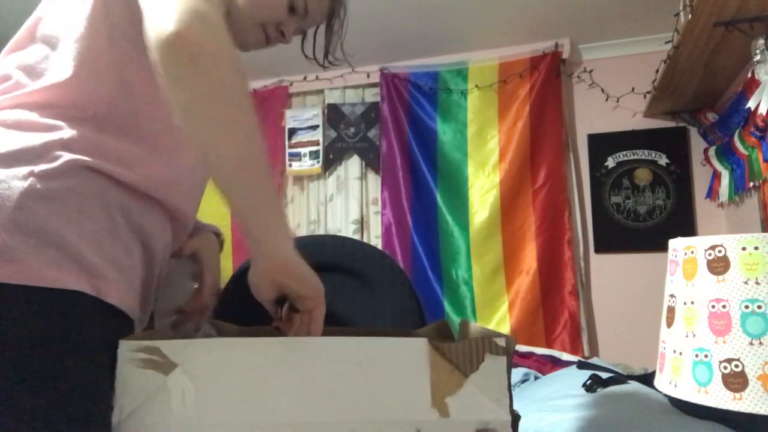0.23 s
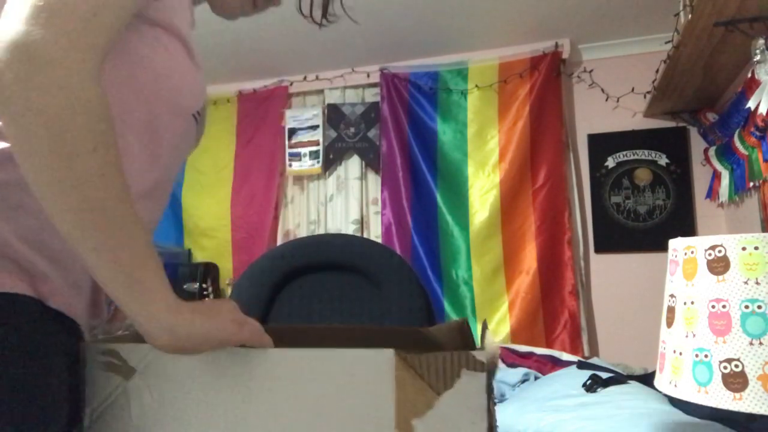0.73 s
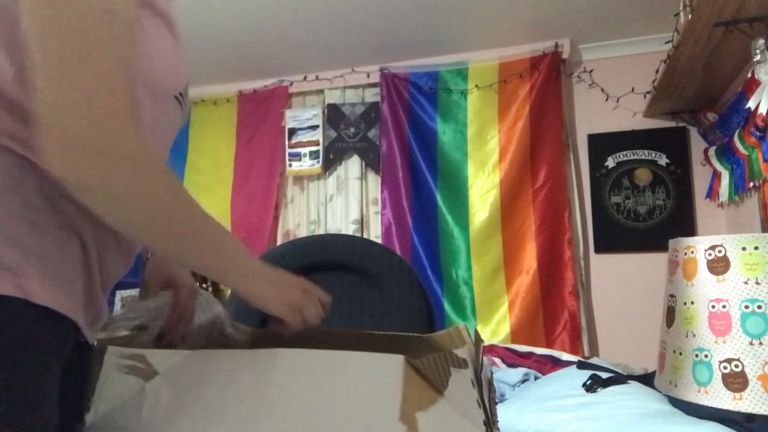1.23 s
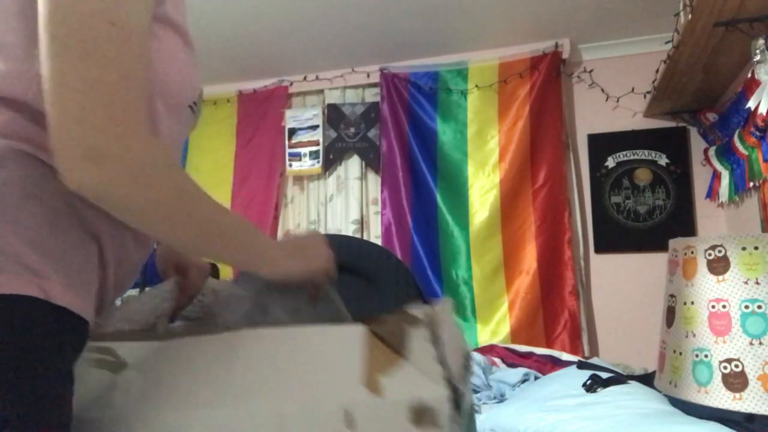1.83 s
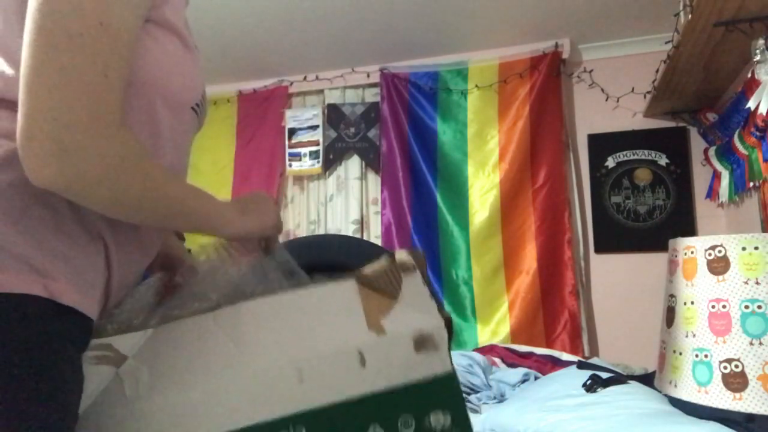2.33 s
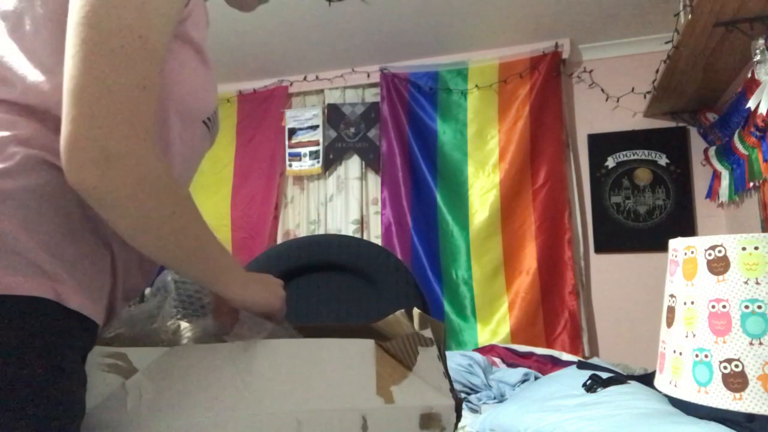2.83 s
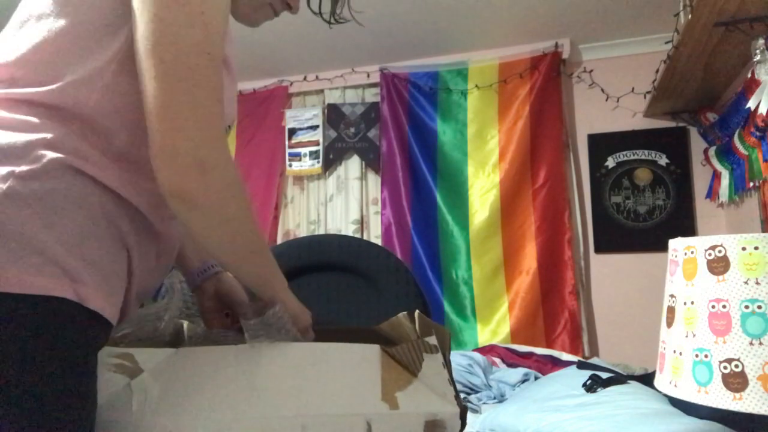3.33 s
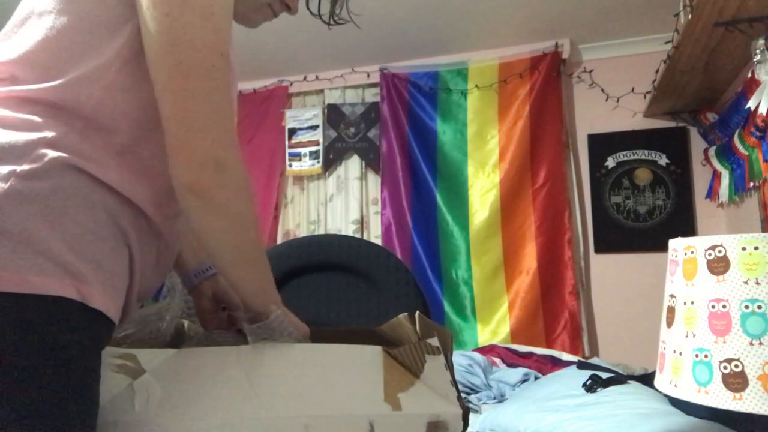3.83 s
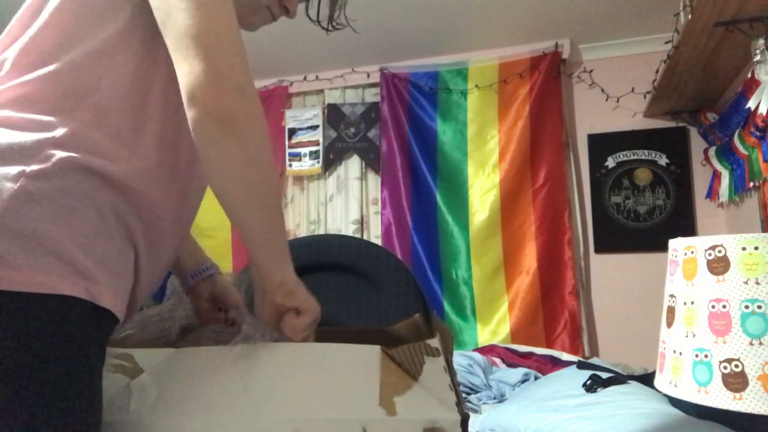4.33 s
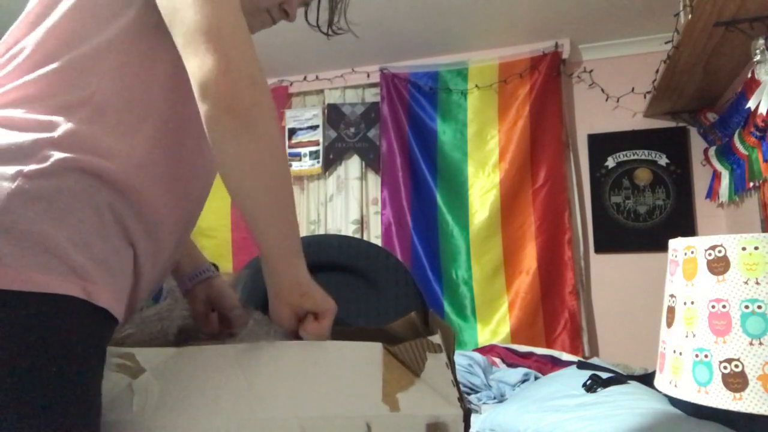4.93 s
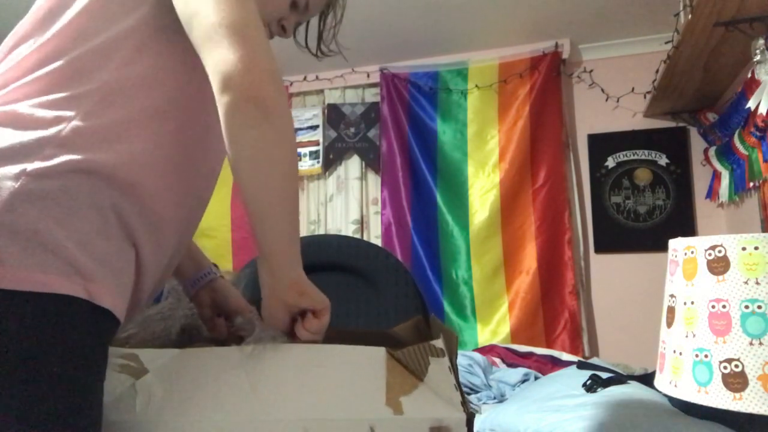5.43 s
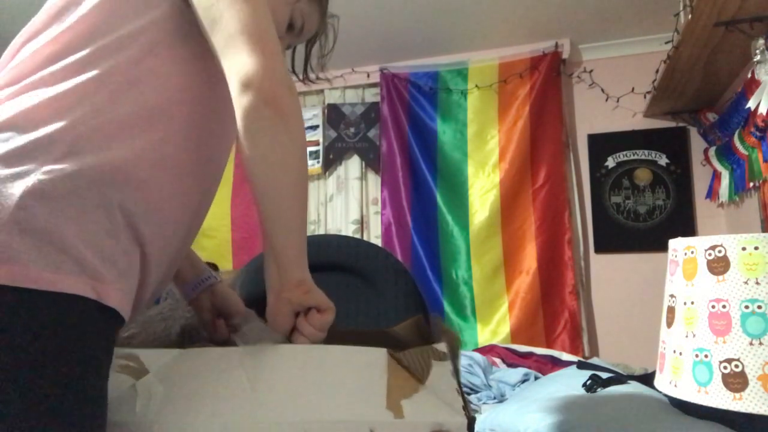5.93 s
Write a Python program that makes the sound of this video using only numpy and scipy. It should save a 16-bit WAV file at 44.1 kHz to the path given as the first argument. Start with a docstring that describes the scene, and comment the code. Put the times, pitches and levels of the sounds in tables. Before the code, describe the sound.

In a small bedroom, crisp packing paper is worked inside a cardboard box. Uneven crinkling opens with a light tap, quick scrapes come at about one second, then a fuller rustle and a loud crease snap. Box knocks follow in the middle, a sharp pair past four seconds, then quieter crackle before a heavy tumble of cardboard knocks at the end. A close small microphone, little deep bass, faint low hum.

```python
"""Crinkling, sliding and snapping paper, knocks and bumps of a cardboard box, a low hum in a small bedroom.
Packing paper is pulled about: its buckles are clumped damped cycles over a noise swish.
Sliding strokes are flurries of slips; creases snap as a tick plus facet modes.
Knocks sum noise, a flap tone and panel modes; bumps are resonant noise puffs.
Short room responses surround the sources; air is shaped noise, hum wavering sines."""
import sys
import numpy as np
from scipy import signal
from scipy.fft import rfft, irfft, next_fast_len
from scipy.io import wavfile
from scipy.ndimage import map_coordinates

SR = 44100
rng = np.random.default_rng(int(sys.argv[2]) if len(sys.argv) > 2 else 0)


def transcribe(u):
    """Save the signal u as a 16-bit wav file named by the first command-line argument.

    u: samples, shape (n,) or (channels, n), limited to [-1, 1]; the rate is SR.
    q: integer samples, one column per channel.
    """
    v = np.clip(np.atleast_2d(u).T, -1, 1)
    q = np.round(v * 32767).astype(np.int16)
    wavfile.write(sys.argv[1], SR, q)


N = 272317
TIME = np.arange(N) / SR  # s
AGE = np.arange(SR // 3) / SR  # s since a blow

# Levels in the tables precede the trims named in the functions.
# Pulls on the wrapping. Each row: crest in s, rise in s, fall in s, crinkle level at the crest in dB,
# rub on the box relative to it in dB.
PULL_ROWS = [(0.03, .1, 0.35, -48, -11), (0.14, .06, 0.14, -50.5, 4), (0.4, 0.12, .15, -55.5, -8),
             (0.58, 0.36, 0.25, -50.5, -0.5), (0.79, 0.095, 0.051, -56.5, 2), (1.04, 0.089, 0.12, -50, -6),
             (1.19, 0.21, 0.27, -50, -1.5), (1.39, 0.067, 0.082, -49, -0.5), (1.559, 0.17, 0.66, -41.5, -2),
             (1.74, 0.063, 0.12, -46, -5.5), (1.88, 0.14, 0.32, -48, -3.5), (2.11, 0.056, 0.056, -62, 9),
             (2.31, 0.034, 0.059, -64, 5.5), (2.5, 0.067, 0.14, -49, -5), (2.61, 0.2, 0.092, -43, 0),
             (2.77, 0.085, .15, -52.5, -2), (2.93, 0.13, 0.2, -45.5, 0), (3.2, 0.13, 0.28, -55, -5),
             (3.46, 0.057, 0.035, -52.5, -1.5), (3.528, 0.027, 0.065, -56, 2.5),
             (3.631, 0.031, .08, -53.5, -6), (3.77, 0.017, 0.026, -56, -10), (3.85, 0.098, .18, -61, 0),
             (4.03, .1, 0.4, -49.5, -1.5), (4.19, 0.24, 0.14, -54, -13), (4.31, 0.11, 0.21, -49.5, 2.5),
             (4.46, 0.096, 0.13, -52, -3.5), (4.539, 0.073, 0.1, -54.5, -8), (4.8, 0.055, 0.37, -51, 0.5),
             (5.06, 0.15, 0.091, -58.5, 3.5), (5.21, 0.083, 0.34, -54, -3.5), (5.45, 0.11, 0.063, -54.5, 0),
             (5.52, 0.033, 0.015, -53.5, 2.5), (5.579, .02, 0.018, -56, -14), (5.64, .03, .2, -60.5, -2),
             (5.743, .04, 0.12, -48.5, -4.5), (5.89, 0.029, 0.37, -57.5, -3), (6.06, 0.23, 0.088, -47, 3.5),
             (6.17, 0.071, 0.056, -50.5, -3)]
# Hiss of the sheets relative to their crinkle. Each row: time in s, level in dB.
SIZZLE_LEVEL = [(0, -19), (0.8, -15), (1.4, -22), (1.95, -17), (2.3, -38), (2.55, -19), (3.0, -17),
                (3.7, -20), (4.4, -23), (4.95, -11.5), (5.3, -14), (6.17, -22)]
# Strokes of a sheet over the card. Each row: start in s, crest in s, end in s, level at the crest in dB,
# sheet resonance in Hz, resonance level relative to the scrape in dB.
STROKE_ROWS = [(0.512, 0.546, 0.62, -42.5, 1070, -1), (0.887, 0.9, 1.03, -37, 4170, -5.5),
               (0.901, 0.97, 1.012, -29, 1140, -9.5), (0.983, 1.006, 1.066, -27, 4600, -11.5),
               (1.363, 1.399, 1.404, -39, 5100, -2), (1.485, 1.595, 1.6, -33.5, 2880, -30),
               (2.953, 2.993, 3.03, -37, 2800, -15), (3.015, 3.026, 3.055, -31.5, 1330, -5.5),
               (4.253, 4.258, 4.426, -35, 1190, -7), (4.311, 4.364, 4.365, -34, 850, -7),
               (4.785, 4.8, 4.95, -44.5, 870, -3), (4.871, 4.901, 4.966, -39.5, 1978, -8.5),
               (5.184, 5.2, 5.222, -46, 900, -2), (5.946, 6.005, 6.03, -33.5, 3230, -31)]
# Creases that snap through. Each row: time in s, level in dB, pitch in Hz, tick relative to the level in dB.
SNAP_ROWS = [(0.0598, -35, 2650, -20), (1.13, -43, 1200, -9), (1.181, -41, 1630, -18),
             (1.1875, -36, 1340, -12), (1.209, -38.5, 1280, -7.5), (1.2468, -29.5, 2770, -11.5),
             (1.3685, -32, 2770, -16), (1.395, -35.5, 3900, -25), (1.4706, -38, 3600, -18),
             (1.621, -27.5, 1430, -12), (1.7462, -23.5, 3320, -20), (1.8163, -9.5, 1795, -22),
             (1.861, -33, 1590, -8), (2.314, -44, 3350, -30.5), (2.4778, -38, 2300, -23),
             (2.5602, -32, 1610, -6), (2.7374, -39, 1520, -15), (2.8997, -31.5, 2800, -16),
             (2.9322, -36, 1210, -19), (2.971, -25, 2500, -24), (3.034, -20.5, 2240, -25),
             (3.098, -43, 1230, -3), (3.321, -39.5, 2540, -25), (3.456, -34, 2300, -32),
             (3.5217, -35.5, 1070, -18), (4.0184, -29.5, 2350, -17), (4.438, -35, 3450, -27.5),
             (4.4574, -35, 1200, -12), (5.2978, -39.5, 3105, -12), (5.736, -37, 3560, -24),
             (5.8797, -39, 2200, -24)]
# Modes of a paper facet. Each row: multiple of the lowest mode, level in dB.
FACET_MODES = [(1, 0.5), (1.2, -10), (1.45, -12.5), (1.77, -3), (2.12, -9.5), (2.4, -7), (2.75, -15)]
# Knocks on flaps and walls. Each row: time in s, level in dB, panels relative to it in dB,
# crack relative to it in dB, flap pitch in Hz.
KNOCK_ROWS = [(0.011, -25, -21, -8, 1180), (0.017, -30, -29, -6, 1920), (0.322, -30.5, -9, -5, 1670),
              (2.103, -29.5, -15, -27, 1140), (2.423, -31, -17, -18, 1110), (2.559, -23.5, -12, -9.5, 1490),
              (2.591, -21.5, -7, -14, 780), (2.613, -38, -19, -7, 840), (2.959, -25, -19, -28, 1240),
              (2.971, -26, -6, -6.5, 1370), (3.117, -33.5, -28, -13, 1200),
              (3.632, -15.5, -12.5, -16, 1000), (3.638, -25.5, -13, -19, 2300),
              (4.257, -18.5, -13.5, -10, 1390), (4.305, -13.5, -11.5, -10, 1100),
              (4.309, -16, -10.5, -10.5, 2560), (4.404, -28, -5, -34, 700), (4.791, -24.5, -12.5, -28, 830),
              (4.835, -19, -8, -18.5, 1475), (5.181, -44, -6.5, -5.5, 1370), (5.447, -34, -11, -13, 1590),
              (5.624, -41.5, -21, -8.5, 1450), (5.691, -39, -9, -25, 608), (5.935, -7.5, -12, -12, 575),
              (5.940, -14.5, -23, -11, 2720), (5.966, -18.5, -5, -10, 570), (5.976, -18.5, -16, -7.5, 3260),
              (5.983, -20.5, -12, -18.5, 570), (6.026, -14, -15.5, -16, 1260),
              (6.035, -18.5, -9.5, -9, 1270), (6.154, -27, -15, -31, 860)]
# Modes of the cardboard panels. Each row: mean frequency in Hz, mean level in dB, t60 in s.
PANEL_MODES = [(163, -10.5, 0.13), (246, -7.5, 0.19), (325.4, -9, 0.14), (412, -6, 0.025), (481, -3, 0.11),
               (541.5, 1.5, 0.095), (623, -2, 0.085), (777, 1, 0.062), (1012, -3, 0.065), (1220, -7, 0.035),
               (1770, -3.5, 0.048), (2450, -17, 0.036), (2800, -31, 0.034)]
# Soft bumps of the whole box. Each row: time in s, level in dB, pitch in Hz.
BUMP_ROWS = [(0.009, -28, 308), (0.014, -31, 86.6), (0.115, -28, 166), (0.137, -33, 149),
             (0.325, -35.5, 247), (0.617, -34.5, 210), (0.635, -35.5, 540), (1.479, -39, 75),
             (1.82, -26, 476), (1.935, -34.5, 417), (2.594, -46, 760), (2.954, -36, 265),
             (2.974, -31.5, 323), (3.635, -32, 261), (4.307, -23.5, 424), (4.325, -27, 268),
             (4.898, -31, 210), (4.98, -32, 149.9), (4.982, -40, 516), (5.939, -24.5, 75),
             (5.969, -18, 170), (5.975, -22.5, 540), (6.039, -26, 67.7)]
# Spectra of buckles, hiss, wall rub, slide, flap, crack and room air.
# Each row: frequency in Hz, relative level in dB per Hz.
CRINKLE_SPECTRUM = [(100, -16), (400, -14.5), (1100, 1), (2200, -3.5), (4200, -3), (7000, -6),
                    (10300, -14.5), (12500, -14), (16000, -19.5)]
SIZZLE_SPECTRUM = [(3000, -34), (6000, -5), (9000, 9), (10300, -8), (12500, -4), (16000, -8)]
RUB_SPECTRUM = [(40, -14), (80, -1), (170, -4), (280, -1), (600, 0), (1000, -6), (2000, -18.5), (6000, -45)]
SLIDE_SPECTRUM = [(60, -24), (200, -11), (350, -6), (800, -5), (1200, -4.5), (1600, -9.5), (3800, -7),
                  (6300, -8.5), (8500, -11.5), (10300, -19), (12500, -15.5), (16000, -21)]
FLAP_SPECTRUM = [(80, -37), (300, -12.5), (600, -4.5), (1250, 0.5), (2600, -7.5), (4200, -9.5), (7000, -43),
                 (16000, -36)]
CRACK_SPECTRUM = [(500, -4.5), (2500, 1.5), (4200, -2.5), (6500, -6.5), (9000, -11.5), (10300, -21),
                  (12500, -18.5), (16000, -30.5)]
AIR_SPECTRUM = [(20, -63), (45, 23), (72, 18.5), (85, 10), (100, -12), (125, 9), (150, -10), (200, -4),
                (450, -13), (2700, -7), (6500, -34), (16000, -58)]
# Room decay. Each row: frequency in Hz, t60 in s.
ROOM_DECAY = [(80, 0.34), (260, 0.46), (700, 0.17), (2000, 0.15), (5000, 0.12), (14000, 0.19)]
# Early wall echoes. Each row: mean delay in s, linear gain.
WALL_ECHOES = [(.0031, 0.16), (.0064, 0.14), (0.0142, 0.11), (.018, 0.099)]
# Hum partials. Each row: frequency in Hz, rms level in dB.
HUM_PARTIALS = [(96.9, -69), (147, -70.5)]


def amp(db):
    """Decibels to gain."""
    return 10 ** (np.asarray(db) / 20)


def unit(x):
    """Scale to rms 1."""
    return x / np.sqrt(np.mean(x ** 2) + 1e-20)


def blow(x):
    """Scale a transient to the energy of one millisecond at rms 1."""
    return x / np.sqrt(np.sum(x ** 2) * 1000 / SR + 1e-20)


def fade(t_s, t60_s):
    """Exponential decay, 60 dB down after t60."""
    return np.exp(-np.log(1000) * t_s / t60_s)


def along(points, hz):
    """Interpolate (Hz, value) points on a log frequency axis."""
    point_hz, value = np.transpose(points)
    return np.interp(np.log(hz + 1), np.log(point_hz), value)


def wobble(rate_hz):
    """Smooth random curve with rate_hz knots a second."""
    knots = rng.standard_normal(int(N * rate_hz / SR) + 4)
    return map_coordinates(knots, [TIME * rate_hz])


def colour(x, spectrum):
    """Causal minimum-phase filter, made by folding the cepstrum of the given spectrum."""
    m = 2 * next_fast_len(len(x) // 2 + 4096)
    gain = amp(along(spectrum, np.fft.rfftfreq(m, 1 / SR)))
    cepstrum = irfft(np.log(gain))
    cepstrum[1:m // 2] *= 2
    cepstrum[m // 2 + 1:] = 0
    response = np.exp(rfft(cepstrum))
    return irfft(rfft(x, m) * response)[:len(x)]


def resonate(x, hz, q):
    """One resonance."""
    b, a = signal.iirpeak(min(hz, SR / 4), max(q, .5), SR)
    return signal.lfilter(b, a, x)


def burst(t60_s):
    """Dying puff of noise."""
    return rng.standard_normal(len(AGE)) * fade(AGE, t60_s)


def add(track, start_s, x):
    """Mix x into the track at start_s."""
    i = max(round(start_s * SR), 0)
    track[i:i + len(x)] += x[:max(N - i, 0)]


def grains(rate_hz, spread_db, cap_db, centre_hz, cycles, samples=220):
    """Tiny buckles of a sheet: damped cycles of random pitch and strength, rms 1."""
    count = int(rate_hz * N / SR)
    start = rng.integers(0, N, count)
    hz = np.clip(centre_hz * np.exp(0.67 * rng.standard_normal((count, 1))), 400, SR / 3)
    strength_db = np.minimum(spread_db * rng.exponential(size=(count, 1)), cap_db)
    strength = amp(strength_db) * rng.choice([-1, 1], (count, 1))
    t = AGE[:samples]
    waves = strength * hz ** 0.62 * np.sin(2 * np.pi * hz * t) * fade(t, cycles / hz)
    index = start[:, None] + np.arange(len(t))
    return unit(np.bincount(index.ravel(), waves.ravel())[:N])


def wrapping(swish_db=-5.5, rub_db=-1.0, clump_db=2, crowded_db=-42):
    """Worked sheets buckle in clumps over a fine swish and hiss, and rub the box walls."""
    work, rub = effort()
    clumps = amp(clump_db * wobble(rate_hz=55))
    ticks = grains(rate_hz=700, spread_db=4.5, cap_db=20, centre_hz=6000, cycles=4)
    facets = grains(rate_hz=450, spread_db=5.5, cap_db=18, centre_hz=3000, cycles=11)
    crowd = grains(rate_hz=4000, spread_db=3.5, cap_db=14, centre_hz=3600, cycles=5)
    share = work / (work + amp(crowded_db))  # harder work crowds the buckles together
    mixed = np.sqrt(1 - share) * unit(ticks + facets) + np.sqrt(share) * crowd
    buckles = unit(colour(clumps * mixed, CRINKLE_SPECTRUM))
    swish = unit(colour(rng.standard_normal(N), CRINKLE_SPECTRUM))
    walls = unit(colour(clumps * rng.standard_normal(N), RUB_SPECTRUM))
    hiss = unit(colour(clumps * rng.standard_normal(N), SIZZLE_SPECTRUM))
    hiss_db = np.interp(TIME, *np.transpose(SIZZLE_LEVEL))
    sheets = buckles + amp(swish_db) * swish + amp(hiss_db) * hiss
    return work * sheets + rub * amp(rub_db) * walls


def effort(rest_db=-72, drop_db=15):
    """Each pull tightens the wrapping to its crest, then lets it relax: (crinkle gain, rub gain)."""
    # resting wrapping keeps settling; a pull swells and dies by drop_db over its rise and fall
    crinkle_power, rub_power = np.full((2, N), amp(rest_db) ** 2)
    for crest_s, rise_s, fall_s, db, rub_db in PULL_ROWS:
        away = np.maximum((crest_s - TIME) / rise_s, (TIME - crest_s) / fall_s)
        gain = amp(db - drop_db * np.minimum(away, 10))
        crinkle_power = crinkle_power + gain ** 2
        rub_power = rub_power + (gain * amp(rub_db)) ** 2
    return np.sqrt(crinkle_power), np.sqrt(rub_power)


def slides(catch=0.87, catch_t60_s=0.012, sheet_q=8, squeak_db=-6):
    """A sliding sheet catches at its folds and lets go in flurries of tiny slips; its taut part resonates."""
    releases = (rng.random(N) < 150 / SR) * 1.0  # 150 a second on average
    flurries = 1 + catch * signal.fftconvolve(releases, fade(AGE, catch_t60_s))[:N]
    slips = flurries * grains(rate_hz=4500, spread_db=3.5, cap_db=11.5, centre_hz=3650, cycles=5.0)
    # taut facets sing briefly
    squeaks = grains(rate_hz=260, spread_db=3, cap_db=9.5, centre_hz=2499, cycles=76, samples=1500)
    scrape = colour(slips + amp(squeak_db) * squeaks, SLIDE_SPECTRUM)
    out = np.zeros(N)
    for start_s, crest_s, end_s, db, hz, ring_db in STROKE_ROWS:
        t = np.arange(start_s, max(end_s, start_s + .01), 1 / SR)
        offset = int(rng.random() * (N - SR))  # each stroke crosses another patch of card
        patch = unit(scrape[offset:][:len(t)])
        force = np.interp(t, [start_s, crest_s, end_s], [0, 1, 0])
        ring = amp(ring_db) * unit(resonate(patch, hz, sheet_q))
        add(out, start_s, amp(db) * force * unit(patch + ring))
    return out


def snaps(ring_db=-4, tick_trim_db=4, ring_t60_s=0.0063, tick_t60_s=0.0023):
    """A crease flips: a sharp tick and a brief ring of the facet beside it."""
    out = np.zeros(N)
    ratio, mode_db = np.transpose(FACET_MODES)[:, :, None]
    for start_s, db, hz, tick_db in SNAP_ROWS:
        phase = 2 * np.pi * rng.random(ratio.shape)
        modes = np.sum(amp(mode_db) * np.sin(2 * np.pi * hz * ratio * AGE + phase), axis=0)
        ring = blow(modes * np.sqrt(AGE) * fade(AGE, ring_t60_s))
        tick = blow(resonate(burst(tick_t60_s), 5400, q=1.0))
        snap = amp(ring_db) * ring + amp(tick_db + tick_trim_db) * tick
        add(out, start_s + 0.000984, amp(db) * snap)
    return out


def knocks(clap_db=-10, flap_db=-9, crush_db=-9, panel_trim_db=5, crack_trim_db=4,
           crush_t60_s=0.042, flap_t60_s=0.013, crack_t60_s=0.033):
    """A struck flap claps and swings briefly, the card crushes and cracks, and the panels ring."""
    out = np.zeros(N)
    hz, mode_db, t60_s = np.transpose(PANEL_MODES)[:, :, None]
    clap = blow(colour(signal.unit_impulse(len(AGE)), FLAP_SPECTRUM))
    for start_s, db, panel_db, crack_db, flap_hz in KNOCK_ROWS:
        strength_db = mode_db + 3.8 * rng.standard_normal(hz.shape)
        strength = amp(strength_db) * rng.choice([-1, 1], hz.shape)
        flex = 1 + 0.016 * rng.standard_normal(hz.shape)  # the grip retunes the panels
        modes = strength * np.sin(2 * np.pi * hz * flex * AGE) * fade(AGE, t60_s)
        ring = blow(np.sum(modes, axis=0))
        swing = blow(np.sin(2 * np.pi * flap_hz * AGE) * fade(AGE, flap_t60_s) * np.sqrt(AGE))
        crush = blow(colour(burst(crush_t60_s), FLAP_SPECTRUM))
        crack = blow(colour(burst(crack_t60_s), CRACK_SPECTRUM))
        contact = amp(clap_db) * clap + amp(crush_db) * crush + amp(crack_db + crack_trim_db) * crack
        body = amp(flap_db) * swing + amp(panel_db + panel_trim_db) * ring
        add(out, start_s + .001, amp(db) * (contact + body))
    return out


def bumps(trim_db=3, t60_s=0.061, rise_s=0.0019, box_q=1.1):
    """Soft blows shake the box and the air inside it: noise puffs through two equal resonances."""
    out = np.zeros(N)
    for start_s, db, hz in BUMP_ROWS:
        push = burst(t60_s) * (1 - np.exp(-AGE / rise_s))
        thud = blow(resonate(resonate(push, hz, box_q), hz, box_q))
        add(out, start_s, amp(db + trim_db) * thud)
    return out


def room(x, wet_db=-6, walls_db=-1, stray=.12):
    """Near walls echo over a short diffuse tail; each moment sounds from another spot of the box."""
    out = np.zeros(N)
    hop = SR // 32
    starts = range(-hop, N, hop)
    noise = rng.standard_normal((len(starts), SR // 4))
    hz, t, z = signal.stft(noise, SR, nperseg=256)
    decay = fade(t, along(ROOM_DECAY, hz)[:, None])
    tails = signal.istft(z * decay, SR, nperseg=256)[1]
    for start, tail in zip(starts, tails):
        response = amp(wet_db) * tail / np.linalg.norm(tail)
        response[0] = 1  # direct sound
        for delay_s, gain in WALL_ECHOES:
            strayed_s = delay_s * np.exp(stray * rng.standard_normal())
            response[round(strayed_s * SR)] += gain * amp(walls_db)
        i = np.arange(max(start, 0), min(start + 2 * hop, N))
        piece = x[i] * np.sin(np.pi * (i - start) / (2 * hop)) ** 2  # overlapping windows sum to 1
        add(out, i[0] / SR, signal.fftconvolve(piece, response / np.linalg.norm(response)))
    return out


def background(air_db=-66, hum_trim_db=-4):
    """Still room air as shaped noise, and a low hum wavering in level and phase."""
    hum = np.zeros(N)
    for hz, db in HUM_PARTIALS:
        gain = amp(db + hum_trim_db + 1.8 * wobble(rate_hz=4.03)) * np.sqrt(2)
        hum += gain * np.sin(2 * np.pi * hz * TIME + wobble(rate_hz=8.6))
    air = unit(colour(rng.standard_normal(N), AIR_SPECTRUM))
    return hum + amp(air_db) * air


def scene():
    """Paper and box sound in the room, over its background."""
    sources = wrapping() + slides() + snaps() + knocks() + bumps()
    return (room(sources) + background())[None]


def record(dry, low_cut_hz=45, top_hz=15900):
    """The small microphone sheds deep bass; nothing passes above the band limit."""
    high_pass = signal.butter(N=3, Wn=low_cut_hz, btype="high", fs=SR, output="sos")
    thin = signal.sosfilt(high_pass, dry)
    m = next_fast_len(N + SR // 4)
    passband = np.fft.rfftfreq(m, 1 / SR) < top_hz
    return irfft(rfft(thin, m) * passband, m)[:, :N]


dry = scene()
out = record(dry)
transcribe(out)
```